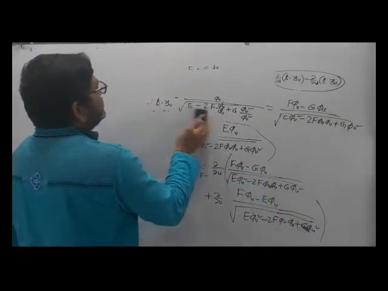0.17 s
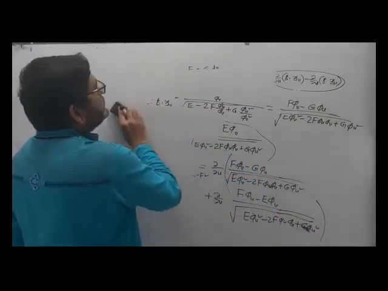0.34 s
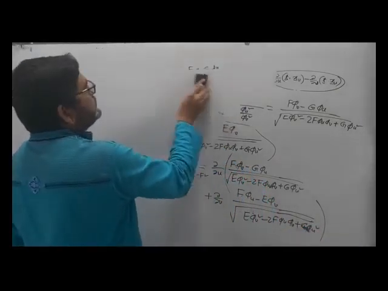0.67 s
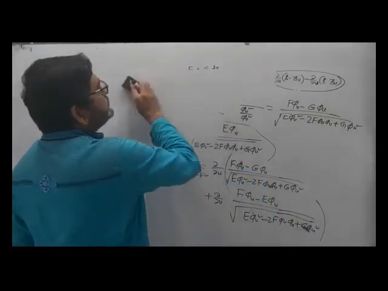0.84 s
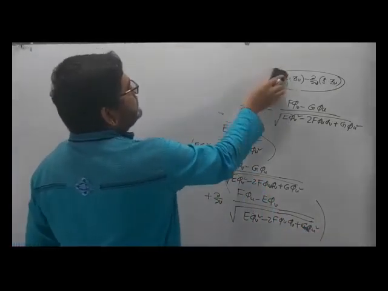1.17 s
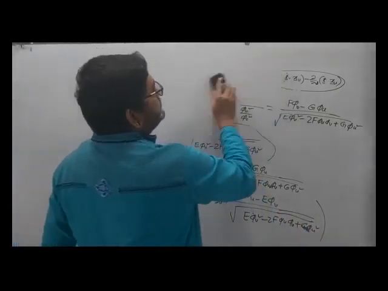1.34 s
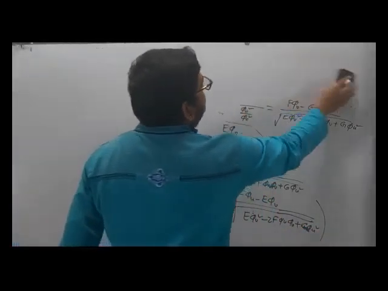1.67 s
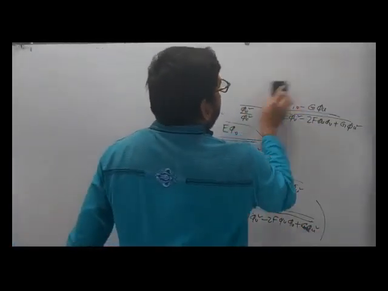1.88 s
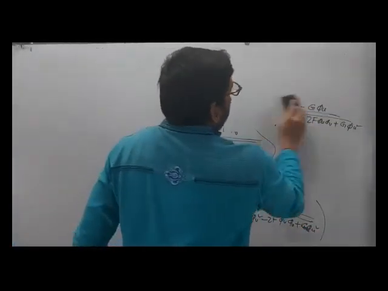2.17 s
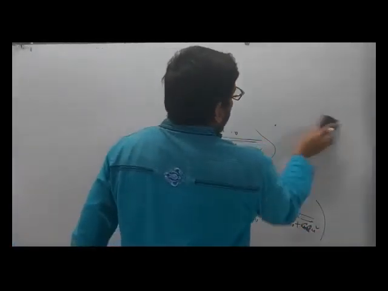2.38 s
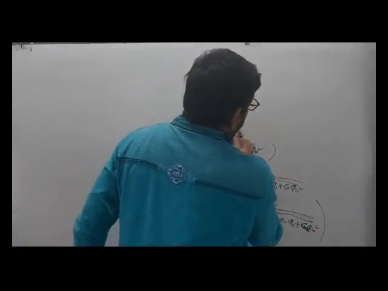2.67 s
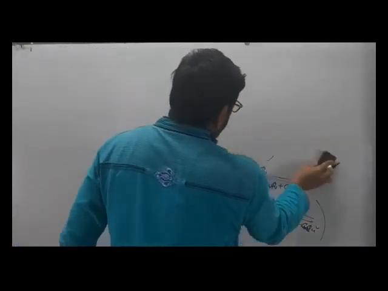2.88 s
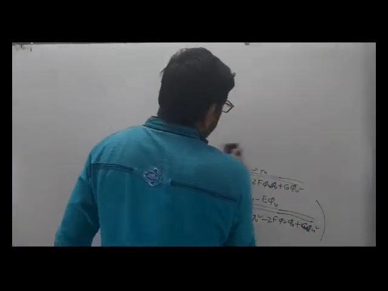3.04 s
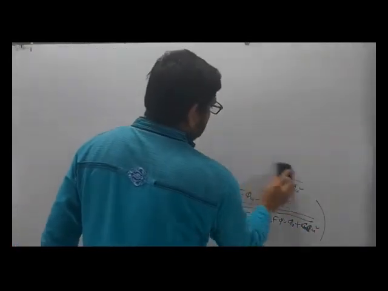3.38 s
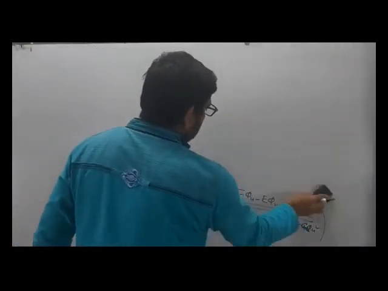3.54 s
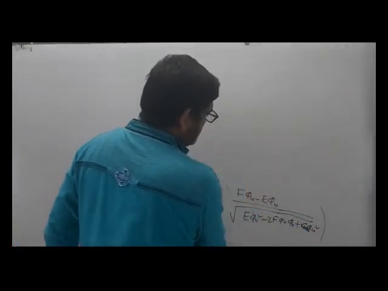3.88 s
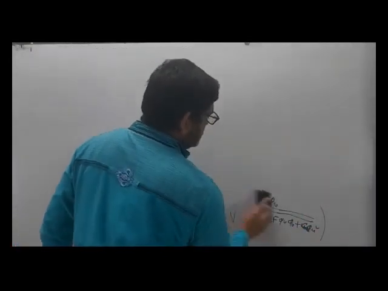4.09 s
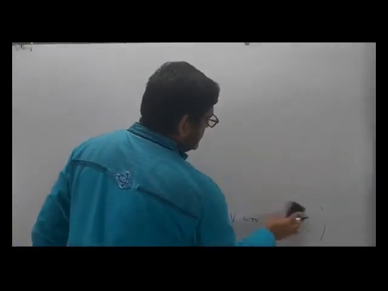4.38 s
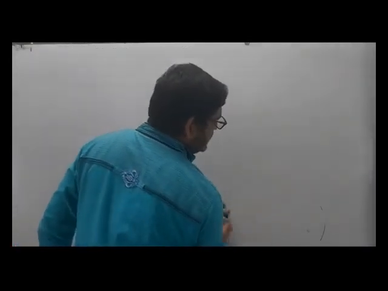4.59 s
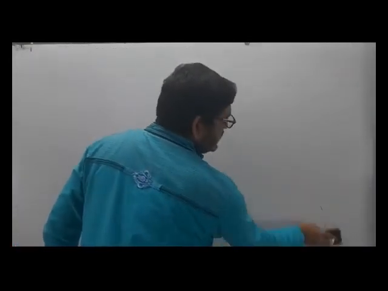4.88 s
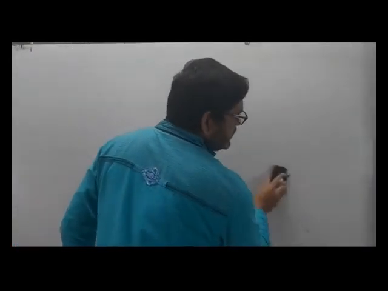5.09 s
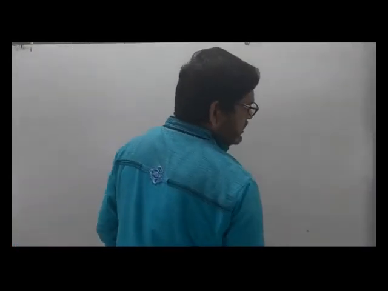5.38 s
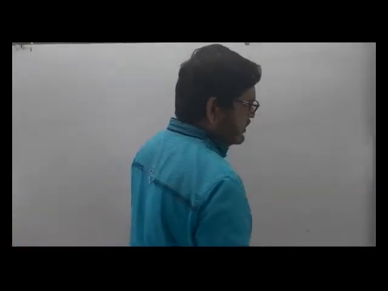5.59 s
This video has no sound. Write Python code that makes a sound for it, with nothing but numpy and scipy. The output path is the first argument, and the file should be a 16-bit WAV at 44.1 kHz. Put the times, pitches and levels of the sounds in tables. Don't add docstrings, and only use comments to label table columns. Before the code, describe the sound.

The sound opens mid-wipe: a felt eraser moves back and forth on a whiteboard close to the microphone, each stroke lasting about a third of a second, swelling and fading as a dry midrange scrub with bright fibre hiss. Behind it a fan farther away gives a steady low hum and airy rumble, wavering slightly. The strokes weaken around 1.2 s, then regain strength. Small plastic ticks fall at about 0.4, 1.65, 2.2 and 2.8 s. Near 3.2 s the board gives a cluster of soft, deep thuds. Wiping continues; a brief lull at 3.8-3.95 s holds another low bump and a bright tick. More even strokes follow, with faint ticks around 4.45 s, growing duller in the last ones. The eraser lifts at about 5.2 s. A tick and the strongest low thud come near 5.45 s, then only fan hum and a final light tick at 5.7 s.

```python
import sys
import numpy as np
from scipy import signal
from scipy.fft import rfft, irfft, next_fast_len
from scipy.io import wavfile
from scipy.ndimage import uniform_filter1d

SR = 44100
rng = np.random.default_rng(int(sys.argv[2]) if len(sys.argv) > 2 else 0)


def convert_level_to_amplitude(level_db):
    exponent = np.asarray(level_db, float) / 20
    return 10 ** exponent


def bounce(signal):
    frames = np.transpose(np.atleast_2d(signal))
    limited = np.clip(frames, -1, 1)
    pcm = np.round(limited * 32767).astype(np.int16)
    wavfile.write(sys.argv[1], SR, pcm)


N = 252291


def evened(x):
    return x / np.sqrt(np.mean(x ** 2) + 1e-20)


def read(points, hz):
    f, value = np.transpose(points)
    return np.interp(np.log(hz + 1), np.log(f + 1), value)


def coloured(x, spectrum):
    size = next_fast_len(len(x))
    gain = convert_level_to_amplitude(read(spectrum, np.fft.rfftfreq(size, 1 / SR)))
    return evened(irfft(rfft(x, size) * gain, size)[:len(x)])


def resonate(x, hz, width):
    turn = np.exp(2j * np.pi * np.cumsum(hz * np.ones(len(x))) / SR)
    r = np.exp(-np.pi * abs(width) / SR)
    return 2 * (turn * signal.lfilter([1 - r], [1, -r], x / turn)).real


def resonate_twice(x, hz, width):
    return resonate(resonate(x, hz, width), hz, width)


def patchy(x, patchy_db, bins, frames):
    z = signal.stft(x, nperseg=256)[2]
    field = rng.standard_normal(z.shape[::-1]).T
    field = evened(uniform_filter1d(uniform_filter1d(field, bins, axis=0), frames, axis=1))
    return evened(signal.istft(z * convert_level_to_amplitude(patchy_db * field), nperseg=256)[1][:N])


def add(mix, s, sound):
    part = mix[round(s * SR):][:len(sound)]
    part += sound[:len(part)]


# (frequency [Hz], width [Hz], level [dB])
LOW_ORDERS = [(50.13, 8.1, -49), (97.26, 4.3, -50.5), (147.8, 8.1, -52)]
# (frequency [Hz], width [Hz], level [dB])
HIGH_ORDERS = [(195.1, 9.4, -58.5), (385.5, 10, -70), (743, 18, -79)]
# (time [s], length [s], gain of first [dB], of second [dB], of third [dB])
GUSTS = [(.09, 0.1, -2, 13.5, 4), (0.357, 0.13, 10, -11, -1), (0.817, .12, 4.5, 7.5, -10),
         (0.96, 0.082, 6, 3, 10), (1.526, 0.16, -3, 4.5, 1), (2.55, 0.087, -3, -4, 0),
         (2.78, 0.093, -2, 8.5, -1), (3.5, .2, -1.5, 4.5, -4), (3.91, 0.072, 8, -2, 4.5),
         (4.182, 0.14, -21, 8, 4.5), (4.448, .2, 3.5, -4.5, 3), (4.996, 0.17, -0.5, 1.5, 2.5)]
# (time [s], level [dB])
FAN_LOAD = [(0.0, -46.5), (0.37, -46), (0.72, -47), (1.03, -46), (1.78, -47), (1.89, -47), (2.15, -45.5),
            (2.55, -47.5), (2.93, -45), (3.15, -44.5), (3.47, -48), (4.41, -46), (4.72, -47), (5.11, -49),
            (5.72, -49)]
# (frequency [Hz], density [dB per Hz])
RUMBLE_SPECTRUM = [(15, -48), (25, -9.5), (65, -5), (128, -1), (380, -13.5), (454, -20), (738, -20.5),
                   (1200, -28.5), (1560, -52), (2640, -120)]
# (frequency [Hz], density [dB per Hz])
AIR_SPECTRUM = [(590, 15), (1000, -4), (1440, -2), (1560, 6), (3570, 0.5), (5850, -6), (9680, -17.5),
                (11900, -37), (15500, -44)]


def fan():
    t = np.arange(N) / SR
    s, db = np.transpose(FAN_LOAD)
    load = convert_level_to_amplitude(0.59 * (np.interp(t, s, db) - np.mean(db)))
    s, length, *gains_db = np.transpose(GUSTS)
    coarse_t = t[::100]
    bell = np.exp(-((coarse_t[:, None] - s) / length) ** 2)
    orders = []
    for (hz, width, db), gain_db in zip(LOW_ORDERS, gains_db):
        orders.append((hz, width, db + np.interp(t, coarse_t, bell @ gain_db)))
    waver = 1 + 0.0061 * evened(uniform_filter1d(rng.standard_normal(N), size=9000))
    hum = np.zeros(N)
    for hz, width, db in [*orders, *HIGH_ORDERS]:
        steady = np.sqrt(2) * np.sin(2 * np.pi * (np.cumsum(hz * waver) / SR + rng.random()))
        unsteady = evened(resonate_twice(rng.standard_normal(N), hz, width))
        hum += convert_level_to_amplitude(db) * evened(steady + 0.98 * unsteady)
    rumble = coloured(patchy(rng.standard_normal(N), patchy_db=0.87, bins=2, frames=40), RUMBLE_SPECTRUM)
    air = coloured(patchy(rng.standard_normal(N), patchy_db=1.0, bins=6, frames=20), AIR_SPECTRUM)
    return hum + load * convert_level_to_amplitude(-45.5) * rumble + convert_level_to_amplitude(-63.5) * air


# (frequency [Hz], t60 [s])
WALL_DECAY = [(500, 0.25), (2000, 0.62), (8000, 0.32)]


def room(x):
    taps = np.zeros(SR // 2)
    at = np.arange(300, len(taps) - 20, 20)
    taps[at + rng.integers(0, 20, len(at))] = rng.choice([-1., 1.], len(at))
    hz, t, z = signal.stft(taps, SR, nperseg=256)
    t60 = np.maximum(read(WALL_DECAY, hz), .05)[:, None]
    tail = signal.istft(z * convert_level_to_amplitude(-60 * t / t60), SR, nperseg=256)[1]
    return signal.fftconvolve(x, tail / np.linalg.norm(tail))[:N]


# (time [s], peak [dB], frequency [Hz], length [cycles], below 0 pulled first)
BUMPS = [
    (3.177, -29.5, 96, 1.7),
    (3.201, -25.5, 50, 0.94),
    (3.21, -32.5, 54.3, -1.5),
    (3.8987, -28.5, 101, 1.5),
    (5.46, -23, 85.4, 1.02),
]


def bumps():
    out = np.zeros(N)
    for s, db, hz, cycles in BUMPS:
        u = np.arange(0, abs(cycles) / hz, 1 / SR)
        add(out, s, convert_level_to_amplitude(db) * np.sin(2 * np.pi * hz * u) * np.sin(np.pi * u * hz / cycles))
    return out


# (time [s], peak [dB], main ring [Hz], bright ring [Hz], bright share [dB])
TICKS = [(.375, -38, 700, 3330, -18), (1.6503, -31, 1320, 1910, -16), (1.667, -37, 720, 1500, -21),
         (1.781, -45, 860, 1500, -14), (2.198, -41, 2670, 4500, -9), (2.245, -33, 715, 1390, -7),
         (2.354, -41, 620, 1800, -8), (2.768, -40, 900, 1600, -6), (3.966, -33.5, 1200, 4050, 0),
         (4.422, -46, 3340, 4900, -10), (4.501, -40, 2960, 4500, -14), (5.4427, -31, 1290, 1330, -16),
         (5.525, -45, 1500, 4000, -15), (5.7125, -35, 2430, 3600, -6)]


def ticks():
    out, t = np.zeros(N), np.arange(1500) / SR
    for s, db, low_hz, high_hz, bright_db in TICKS:
        t60 = 0.0075 + 3 / low_hz
        low = -np.sin(2 * np.pi * low_hz * t) - 0.82 * np.sin(2 * np.pi * 0.46 * low_hz * t)
        high = np.zeros(len(t))
        for ratio, share in [(1, 1), (1.5, 0.73), (2.7, 0.37)]:
            high += share * np.sin(2 * np.pi * min(ratio * high_hz, 9600) * t)
        edge = signal.butter(6, min(2.8 * high_hz, 10500), fs=SR, output="sos")
        high += 0.69 * signal.sosfilt(edge, rng.standard_normal(len(t)))
        attack = np.minimum(t / 0.00064, 1)
        tick = convert_level_to_amplitude(db - 60 * t / max(t60, .002)) * attack * (low + convert_level_to_amplitude(bright_db) * high)
        add(out, s, tick)
        for wait, size in rng.random((3, 2)):
            add(out, s + .012 * (0.11 + wait), convert_level_to_amplitude(-10) * (2 * size - 1) * tick)
    return out


# (time [s], length [s], pad peak [dB], fibre hiss peak [dB],
# lean of the eraser [-1 to 1], below 0 pulled, above 0 pushed)
STROKES = [(-0.046, 0.25, -52.5, -52, 0.11), (0.149, 0.25, -51.5, -53.5, -0.08),
           (0.33, 0.32, -53, -53, 0.071), (0.602, 0.31, -55, -56.5, -0.09), (0.86, 0.37, -56, -55.5, 0.052),
           (1.176, 0.27, -60.5, -63.5, -0.0046), (1.415, 0.37, -56.5, -54.5, 0.057),
           (1.768, 0.34, -54, -56, -0.064), (2.044, 0.31, -55, -51.5, 0.067),
           (2.323, 0.31, -52, -50.5, -0.084), (2.596, 0.35, -55.5, -54, 0.12),
           (2.898, 0.34, -52.5, -56.5, -0.12), (3.185, 0.39, -56.5, -55, 0.13),
           (3.556, 0.35, -53.5, -53.5, -0.09), (3.8, 0.26, -59, -63.5, 0.093),
           (3.885, 0.05, -72, -60, -0.0059), (3.96, 0.38, -56.5, -54.5, 0.11),
           (4.341, 0.3, -54.5, -56.5, -0.088), (4.593, 0.31, -60, -55, 0.11),
           (4.86, 0.36, -61.5, -56, -0.095)]


def stroke_progress():
    start, length = np.transpose(STROKES)[:2]
    t = np.arange(0, N, 64) / SR
    return t, np.clip((t[:, None] - start) / length, 0, 1)


def arch(peak_db, crest, shift, sharpness, turn_db, fade_db):
    lift_s = 5.24
    lean = np.transpose(STROKES)[4]
    t, u = stroke_progress()
    bent = u ** (np.log(.5) / np.log(np.clip(crest + shift * lean, .2, .8)))
    strokes = convert_level_to_amplitude(peak_db) * abs(np.sin(np.pi * bent)) ** sharpness
    turns = convert_level_to_amplitude(turn_db + fade_db * np.maximum(t - lift_s, 0))
    return np.interp(np.arange(N) / SR, t, strokes.sum(1) + turns)


GRIP_HZ = [3220, 3600, 3120, 3460, 2920, 3280, 3000, 3550, 3050, 3520, 3120, 3450, 3430, 3900, 3400, 3600,
           3440, 3700, 3420, 3400]


def grip_hz():
    rest_hz, sag_hz, sag_power = 3200, 1500, 3.4
    lean = np.transpose(STROKES)[4]
    t, u = stroke_progress()
    hz = np.array(GRIP_HZ) - (lean < 0) * sag_hz * u ** sag_power
    speed = np.sin(np.pi * u)
    blend_hz = ((speed * hz).sum(1) + .2 * rest_hz) / (speed.sum(1) + .2)
    return np.interp(np.arange(N) / SR, t, blend_hz)


def slips(spread_db, patchy_db):
    size = convert_level_to_amplitude(spread_db * np.minimum(rng.exponential(1, N), 6))
    return patchy(size * rng.standard_normal(N), patchy_db, bins=5, frames=14)


PAD_SPECTRUM = [(1300, -32), (1900, -4.5), (2400, -1), (3100, -7), (4000, -2.5), (4800, -8.5), (6000, -40)]
SCRUB_SPECTRUM = [(3000, -30), (4200, -2), (5000, -0.5), (6200, -3), (7300, -4), (9500, -23)]
HISS_SPECTRUM = [(5000, -47), (7000, -7.5), (8500, 1), (9600, 0.5), (10800, -3.5), (12000, -10),
                 (14000, -20.5), (15800, -34)]
RUB_SPECTRUM = [(500, -16), (900, -5.5), (1450, -1), (1900, -3), (2500, -12.5), (3300, -30.5)]
# (crest [0-1 of the stroke], crest shift [per lean], sharpness [power],
# level at the turns [dB], fade after lift-off [dB per s])
PAD_ARCH = (0.56, -0.5, 1.88, -67, -40)
SCRUB_ARCH = (0.56, -.5, 1.44, -69, -42)
HISS_ARCH = (.5, 1.0, 2.04, -69.5, -24)
CORE_ARCH = (.5, 1.3, 8.5, -99, -25)
RUB_ARCH = (0.57, 0.4, 1.6, -63.5, -4)
RASP_ARCH = (0.6, 0.3, 3.7, -94, -25)


def eraser():
    core_hz, rasp_hz = 9920, 2800
    pad_hz = grip_hz()
    pad = coloured(slips(spread_db=0.5, patchy_db=1.5), PAD_SPECTRUM)
    pad = evened(pad + 1.5 * resonate_twice(pad, pad_hz, 1350))
    scrub = coloured(slips(spread_db=1.3, patchy_db=1.5), SCRUB_SPECTRUM)
    hiss = coloured(slips(spread_db=1.2, patchy_db=1.0), HISS_SPECTRUM)
    core = evened(resonate_twice(hiss, core_hz, 2600))
    rub = coloured(slips(spread_db=3.5, patchy_db=1.5), RUB_SPECTRUM)
    rasp = evened(resonate_twice(pad, rasp_hz, 990))

    pad_db, hiss_db = np.transpose(STROKES)[2:4]
    brighter_db = hiss_db - pad_db
    scrub_db = pad_db - 1.5 + 0.33 * brighter_db
    rub_db = pad_db - 9 + 0.87 * brighter_db
    rasp_db = pad_db - 11 - 20 * abs(np.array(GRIP_HZ) - rasp_hz) / 1000

    mix = arch(pad_db, *PAD_ARCH) * pad
    mix += arch(scrub_db, *SCRUB_ARCH) * scrub
    mix += arch(hiss_db, *HISS_ARCH) * hiss
    mix += arch(hiss_db - 12.5, *CORE_ARCH) * core
    mix += arch(rub_db, *RUB_ARCH) * rub
    mix += arch(rasp_db, *RASP_ARCH) * rasp
    unevenness = uniform_filter1d(uniform_filter1d(rng.standard_normal(N), size=1300), size=900)
    judder = convert_level_to_amplitude(0.8 * evened(unevenness))
    return judder * mix


def scene():
    board = eraser() + ticks() + bumps()
    return np.tile(board + convert_level_to_amplitude(-23) * room(board) + fan(), (2, 1))


def top_cut(x):
    return signal.sosfilt(signal.butter(12, 15640, fs=SR, output="sos"), x)


# (time [s], low edge [Hz], high edge [Hz])
WIDE_BANDS = [(.285, 8200, 9800), (.31, 9000, 11200), (.31, 4600, 6500), (.75, 8200, 9800),
              (.75, 11000, 12500), (1.565, 4700, 9800), (1.565, 11000, 12600), (2.84, 11000, 12500),
              (3.7, 5100, 7000), (3.97, 4700, 9000), (4.165, 4200, 7000), (4.165, 11000, 12500),
              (4.49, 6200, 8400), (4.49, 8900, 10500)]


def record(dry):
    bass_cut = signal.butter(2, 35.5, "high", fs=SR, output="sos")
    hz, t, z = signal.stft(signal.sosfilt(bass_cut, dry[0]), SR, nperseg=1024)
    power = abs(z) ** 2
    power_db = 10 * np.log10(uniform_filter1d(power, size=3, axis=0) + 1e-20)
    side = convert_level_to_amplitude(14) * abs(z) * (power_db < -107) * (hz[:, None] > 4000)

    around = uniform_filter1d(uniform_filter1d(power, size=9, axis=0), size=5, axis=1)
    faint_db = 10 * np.log10(around + 1e-20)
    luck = rng.random((len(t) // 3 + 1, len(hz) // 4 + 1)).T
    luck = np.kron(luck, np.ones((4, 3)))[:len(hz), :len(t)]
    loss = np.clip((-93 - faint_db) / 30, 0, .65) * (hz[:, None] > 7000)
    z = z * (luck > loss)

    for s, low_hz, high_hz in WIDE_BANDS:
        band = (hz > low_hz) & (hz < high_hz)
        side[band] += abs(z[band]) * (abs(t - s) < .013) * 0.76
    side = side * np.exp(2j * np.pi * rng.random(z.shape[::-1]).T)
    mix = signal.istft([z + side, z - side], SR, nperseg=1024)[1][:, :N]
    return top_cut(mix)


dry = scene()
out = record(dry)
bounce(out)
```